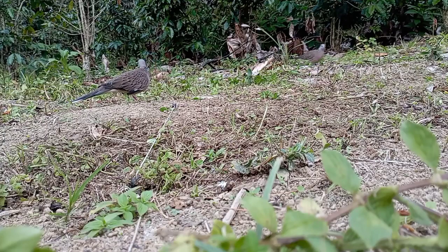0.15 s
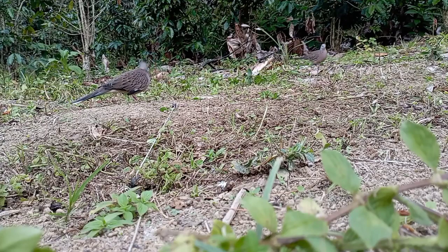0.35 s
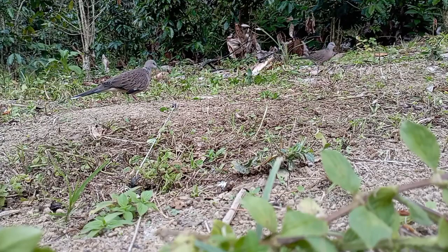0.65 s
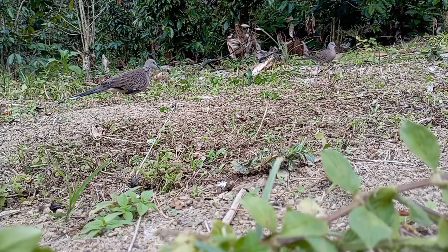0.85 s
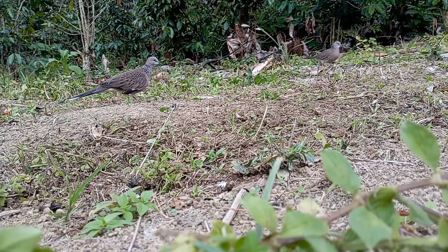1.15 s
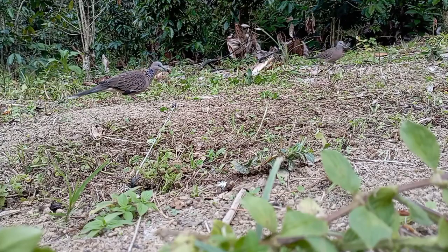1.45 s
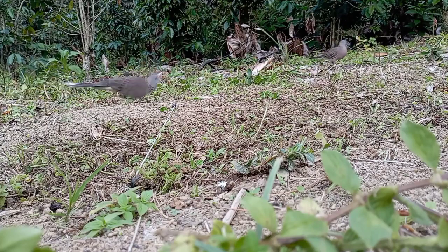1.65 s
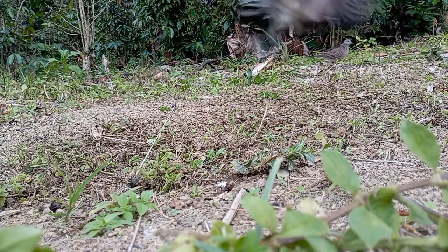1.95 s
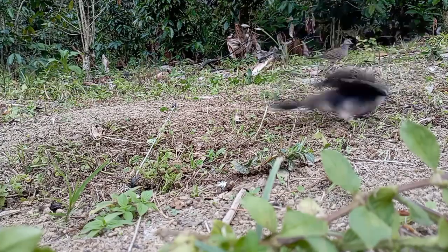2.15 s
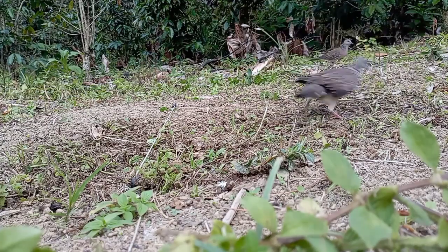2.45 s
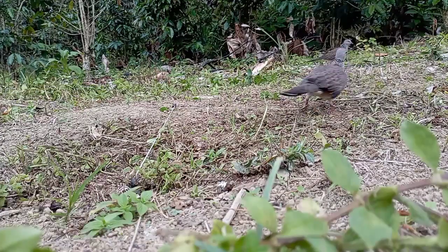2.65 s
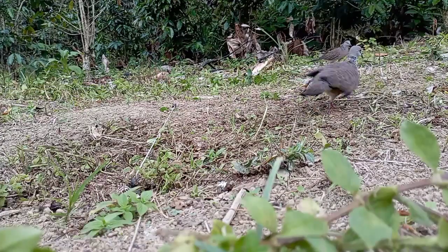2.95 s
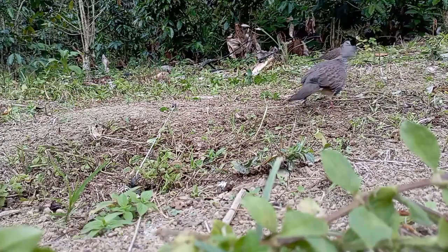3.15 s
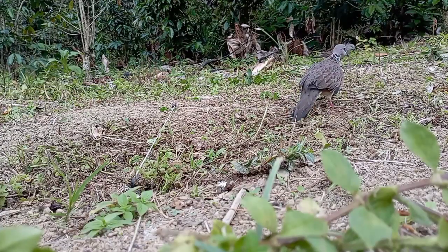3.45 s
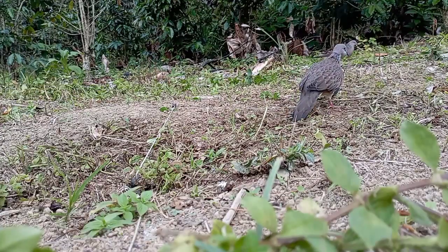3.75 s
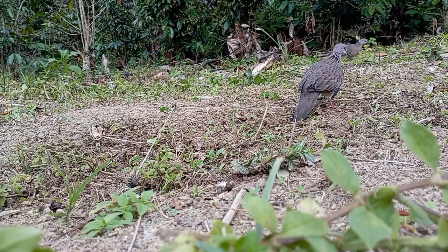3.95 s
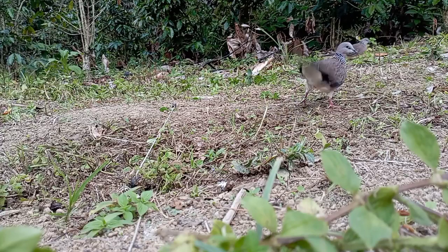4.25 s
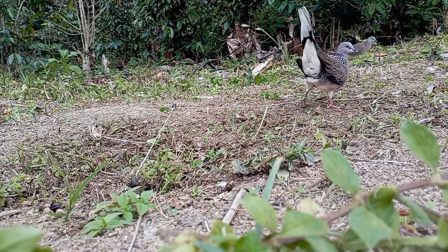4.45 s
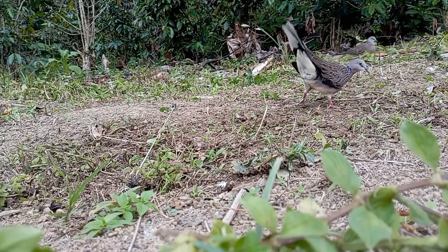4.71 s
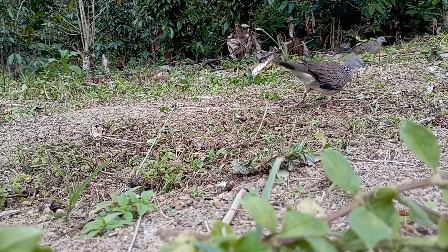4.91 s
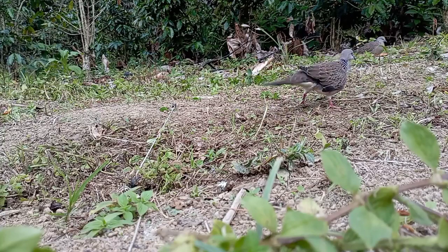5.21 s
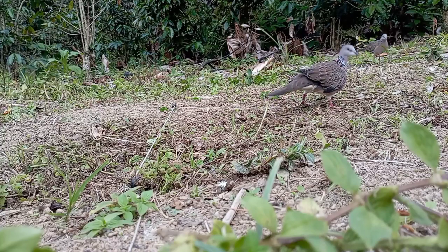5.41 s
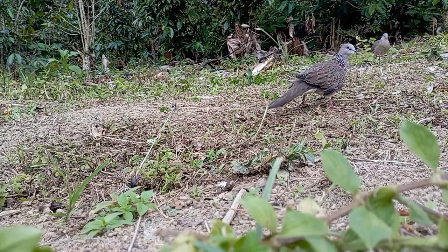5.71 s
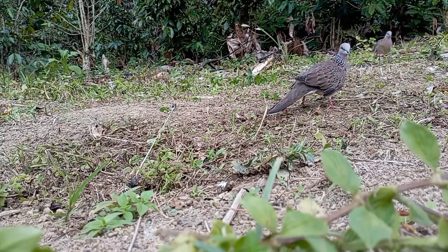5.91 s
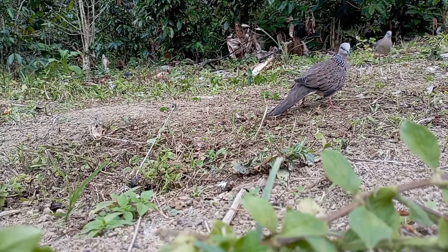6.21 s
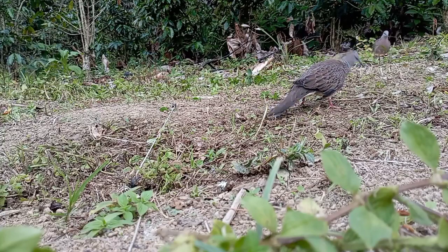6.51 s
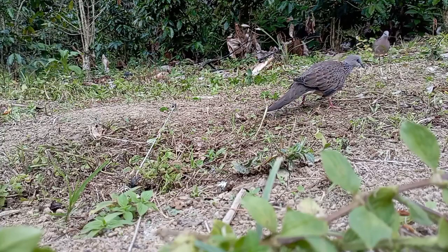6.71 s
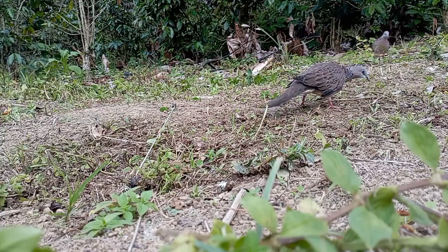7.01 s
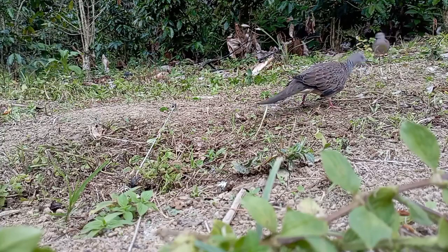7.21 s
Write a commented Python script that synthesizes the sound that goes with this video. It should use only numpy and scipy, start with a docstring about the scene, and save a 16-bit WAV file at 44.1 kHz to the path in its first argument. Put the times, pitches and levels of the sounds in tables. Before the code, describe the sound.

A quiet natural clearing: steady thin insect hiss, rapid cricket trills and barely audible distant doves. Then one sudden close burst of wingbeats, sharp snapping feathers, flat slaps and soft thuds of shoved air, lasting under half a second as the bird brakes and lands. A diffuse leafy echo fades quickly. The insects continue, with small birds chipping in quick falling runs, cricket chirps and a far hooting call near the end.

```python
"""Dove landing in a forest clearing

A dove flutters in close and lands: enveloped noise and short swings of pressure make its wings clap,
shove the air, rustle and hum. Around it lie two shimmering insect bands, squeaks, a pulsing bush cricket
and a chirping field cricket. Gliding tones make far doves coo and small birds call; filtered noise
makes a low distant rumble, and dying noise makes the echo of the trees."""
import sys
import numpy as np
from scipy import signal
from scipy.fft import irfft
from scipy.io import wavfile
from scipy.ndimage import uniform_filter1d

SR = 44100
rng = np.random.default_rng(int(sys.argv[2]) if len(sys.argv) > 2 else 0)


def wav_record(signal):
    """Record a signal, one row per channel, as 16-bit PCM in the file named by sys.argv[1]."""
    frames = np.transpose(np.atleast_2d(signal))
    bounded = np.clip(frames, -1, 1)
    # unit amplitude maps onto the largest positive 16-bit level
    quanta = np.round(bounded * 32767).astype(np.int16)
    wavfile.write(sys.argv[1], SR, quanta)


N = 325017
TIME = np.arange(N) / SR

# stereo width of the surroundings, then of the wings: (frequency [Hz], side minus mid [dB])
WIDTH = [(60, -5.5), (500, -1.5), (1000, 2), (2000, -0.5), (4000, 1), (9000, -0.5), (13000, 0.5)]
WING_WIDTH = [(60, -15), (600, -15.5), (1500, -7), (3000, 2), (5000, 2), (9000, 3), (13000, 0)]
# wing beats: (time [s], half length of contact [s], feather snap [dB], vane slap [dB], shoved air [dB],
# pitch of the shove [Hz], left minus right [dB]); each layer trims these levels
WING_BEATS = [(2.0257, 0.00049, -27, -33.5, -33, 280, -.5), (2.063, 0.0014, -36, -39, -35.5, 192, 2),
              (2.0936, 0.0016, -35.5, -43, -27.5, 380, 5), (2.1331, 0.0045, -37.5, -42.5, -31.5, 116, 3),
              (2.166, 0.0015, -29.5, -39.5, -27.5, 280, -1), (2.196, 0.0018, -52, -45.5, -37, 134, 0),
              (2.2201, 0.0022, -38, -38.5, -41, 250, -8), (2.233, 0.0015, -35, -36.5, -31.5, 197, -2),
              (2.256, 0.0041, -43, -39.5, -31, 520, -3), (2.2785, 0.00059, -29, -42, -28, 112, -3),
              (2.3036, 0.0034, -35, -45.5, -30.5, 236, 0), (2.329, 0.0043, -39.5, -37, -24, 377, -2),
              (2.364, 0.0036, -62, -61, -35, 146, 0), (2.4168, 0.0034, -54, -53, -43, 128, -4)]
# the wings open flat to brake over this time (from, to)
BRAKE_S = (2.04, 2.225)
# slur and hoots of the high doves: pitch at start, middle and end
HOOT_HZ = (850, 1044, 1106)


def from_db(db):
    """Decibels to gain."""
    return 10 ** (np.asarray(db) / 20)


def rms_one(x):
    """Scale to rms 1."""
    return x / np.sqrt(np.mean(x ** 2) + 1e-20)


def pan(db):
    """Left and right gains for a level difference; positive leans left."""
    return from_db(np.array([[db], [-db]]) / 2)


def at_hz(points, hz):
    """Read a spectrum on a log-frequency axis."""
    f, value = np.transpose(points)
    return np.interp(np.log(hz + 1), np.log(f), value)


def noise(spectrum, width):
    """Steady stereo noise of a given colour, falling off beyond its ends; rms 1."""
    hz = np.arange(N // 2 + 1) * SR / N + 1
    low_skirt = np.minimum(1, hz / spectrum[0][0]) ** 2
    high_skirt = np.minimum(1, spectrum[-1][0] / hz) ** 2
    mid, side = rng.standard_normal((2, len(hz))) + 1j * rng.standard_normal((2, len(hz)))
    spread = from_db(at_hz(width, hz))
    gain = from_db(at_hz(spectrum, hz)) * low_skirt * high_skirt / np.sqrt(1 + spread ** 2)
    return rms_one(irfft(gain * (mid + spread * side * [[1], [-1]]), N))


def drift(rate):
    """Random wander through `rate` new values a second; rms 1."""
    return rms_one(np.interp(TIME * rate, np.arange(N), rng.standard_normal(N)))


def bell(s, half):
    """A smooth swell around a moment."""
    return np.exp(-np.clip((TIME - s) / half, -10, 10) ** 2 / 2)


def dying(s, decay_s):
    """A sudden start that dies away exponentially."""
    return (TIME > s) * np.exp(-np.clip((TIME - s) / decay_s, 0, 20))


def tone(hz):
    """A sine whose phase follows a moving pitch."""
    return np.sin(2 * np.pi * np.cumsum(hz) / SR)


def notes(rows, waver=0):
    """Pure notes that swell and fade while the pitch arches through three points."""
    out = np.zeros(N)
    wobble = 1 + waver + .003 * drift(80)
    for s, length, first, middle, last, db in rows:
        i = np.arange(max(0, int(s * SR)), min(N, int((s + length) * SR)))
        u = np.linspace(0, 1, len(i))
        arch = np.polyfit([0, .5, 1], [first, middle, last], 2)
        hz = np.polyval(arch, u) * wobble[i]
        out[i] += from_db(db) * np.sin(np.pi * u) * tone(hz)
    return out


def forest(x, t60, delay):
    """Trunks and leaves scatter a diffuse echo that builds, then dies, different on each side."""
    t = np.arange(SR) / SR
    scatter = rng.standard_normal((2, SR)) * from_db(-60 * t / t60) * (1 - np.exp(-t / delay))
    scatter /= np.sqrt(np.sum(scatter ** 2, axis=1, keepdims=True))
    return signal.fftconvolve(x * np.ones((2, 1)), scatter, axes=1)[:, :N]


def among_trees(song, echo_db=-8):
    """Bird song heard directly and as an echo from the forest."""
    return song * pan(0.43) + from_db(echo_db) * forest(song, t60=0.58, delay=0.011)


def far_air(level_db=-64):
    """Low distant rumble with a faint airy top, its level drifting slightly."""
    # colour: (frequency [Hz], level [dB per Hz])
    air_colour = [(20, -28), (45, -16.5), (75, -0.5), (150, -2.5), (300, -7), (500, -11), (700, -15),
                  (850, -21.5), (1300, -24.5), (2000, -27.5), (4300, -25), (7000, -29.5), (10500, -29),
                  (13000, -33.5)]
    return from_db(level_db + 0.45 * drift(8)) * noise(air_colour, WIDTH) * pan(-0.33)


def insects(high_db=-69.0, low_db=-74.0, squeak_db=-78.5):
    """Many far insects merge into two shimmering noise bands; one squeaks in pairs above them."""
    # colour of each band: (frequency [Hz], level [dB per Hz])
    high_colour = [(6800, -33), (7800, -17), (8250, -6), (8700, -2.5), (9250, -6.5), (9700, -18),
                   (11000, -31)]
    low_colour = [(4600, -31), (5100, -10), (5500, -2.5), (5850, -2), (6250, -2), (6500, -16.5),
                  (7000, -45)]
    high = from_db(high_db + 0.49 * drift(60)) * noise(high_colour, WIDTH) * pan(2.0)
    low = from_db(low_db + 1.45 * drift(30)) * noise(low_colour, WIDTH) * pan(-0.41)
    first_s, every_s, pair_s, count = .129, .2795, .063, 7
    starts = [first_s + n * every_s + k * pair_s for n in range(count) for k in (0, 1)]
    squeaks = notes([(s, .03, 12150, 12080, 11950, squeak_db) for s in starts])
    return high + low + squeaks * pan(3.0)


def bush_cricket(level_db=-70.0, echo_db=-6):
    """Each wing scrape is a short rising tone; about ten make a trill."""
    # the trills fall behind or run ahead of an even beat: (time [s], delay [s])
    trill_delay = [(0, .008), (.55, -.018), (3.25, .025), (4.0, -.011), (4.85, -.021), (5.5, .003)]
    first_rest_s, trill_every_s, rest_s = .096, .22705, .028   # rest_s is each side of the beat
    pulse_hz, low_hz, rise_hz, unevenness = 62.7, 4950, 950, .1
    delay = np.interp(TIME, *np.transpose(trill_delay))
    since_rest = (TIME - first_rest_s - delay) % trill_every_s
    from_nearest_rest = np.minimum(since_rest, trill_every_s - since_rest)
    singing = uniform_filter1d(1. * (from_nearest_rest > rest_s), size=300)   # softened edges
    scrape = (since_rest * pulse_hz + unevenness * drift(40)) % 1   # progress through one scrape
    hz = low_hz + rise_hz * scrape + 35 * drift(100)
    pressure = np.sin(np.pi * scrape) ** 3
    trill = from_db(level_db + drift(40)) * singing * pressure * tone(hz)
    return trill * pan(6.1) + from_db(echo_db) * forest(trill, t60=0.043, delay=0.0053)


def litter(decay_s=0.0029):
    """Dry leaves and twigs give tiny bright ticks of noise that die at once."""
    # ticks: (time [s], level [dB])
    ticks = [(0.2234, -64), (1.8667, -61), (2.4618, -55), (2.484, -59), (2.8389, -61), (6.34, -67)]
    level = sum(from_db(db) * dying(s, decay_s) for s, db in ticks)
    return level * noise([(3000, -16), (7000, -10), (10500, 10), (15000, -3)], WIDTH)


def high_call(s, hold_s, db, hoot_s=.04, held_db=-7.0, spacing_s=0.076, slowing_s=.0055, count=4):
    """Notes of one call: a slur up, a softer held note, then hoots that come ever later."""
    held_hz = (1150, 1195, 1153)
    slur = (s, hoot_s, *HOOT_HZ, db)
    held = (s + hoot_s, hold_s, *held_hz, db + held_db)
    hoots_s = s + hoot_s + hold_s
    hoots = [(hoots_s + k * spacing_s + k * k * slowing_s, hoot_s, *HOOT_HZ, db) for k in range(count)]
    return [slur, held] + hoots


def doves(high_coo_db=-1.5):
    """Far doves coo in arching tones, one in a quickening roll; higher calls break into hoots."""
    # coos: (start [s], length [s], top pitch [Hz], level [dB])
    coo_rows = [(0.268, 0.18, 742, -64.5), (0.867, 0.21, 710, -66.5), (1.363, 0.175, 675, -70),
                (2.739, .1, 680, -72.5), (3.213, 0.108, 690, -76), (3.844, .1, 706, -80),
                (6.543, .11, 711, -73.5)]
    # rolled coo: (start [s], length [s], first, middle, last pitch [Hz], level before the throb [dB])
    rolled_coo = [(.53, .56, 690, 719.5, 660, -71)]
    # high calls: (start [s], hold [s], level before the trim [dB])
    high_calls = [(0.504, .205, -73.5), (5.505, .185, -72.5)]
    first_share, last_share = .72, .758   # pitch at the ends of a coo, as a share of its top
    coos = [(s, length, first_share * hz, hz, last_share * hz, db) for s, length, hz, db in coo_rows]
    roll_hz = np.interp(TIME, [.62, .95], [24, 47])
    throb = 2 * np.pi * np.cumsum(roll_hz) / SR
    # each throb of the roll swells and bends the pitch
    bend = .06 * np.cos(throb) + .006 * drift(50)
    rolled = (1 + np.sin(throb)) * notes(rolled_coo, waver=bend)
    hoots = [note for call in high_calls for note in high_call(*call)]
    return among_trees(notes(coos) + rolled + from_db(high_coo_db) * notes(hoots))


def field_cricket(pitch_hz=4080, direct_db=-1.0, echo_db=-8):
    """Far, short chirps near one pitch, with a soft echo from the trees."""
    # runs of chirps: (first chirp [s], count, level before direct and echo trims [dB])
    chirp_runs = [(.345, 4, -75), (3.125, 7, -74.5), (4.856, 8, -75), (6.575, 8, -76)]
    spacing_s, half_s, waver_hz = .0665, .011, 30
    level = sum(from_db(db) * bell(s + k * spacing_s, half_s)
                for s, count, db in chirp_runs for k in range(round(count)))
    chirps = level * tone(pitch_hz + waver_hz * drift(150))
    echo = from_db(echo_db) * forest(chirps, t60=0.38, delay=0.012)
    return (from_db(direct_db) * chirps + echo) * pan(5.9)


def effort(rise_db_per_s, release_s):
    """Gain of the flight: it swells as the dove comes near, holds, and dies away on landing."""
    full_from_s, full_to_s = 2.033, 2.33
    early = np.maximum(full_from_s - TIME, 0)
    late = np.maximum(TIME - full_to_s, 0)
    return from_db(np.maximum(-rise_db_per_s * early, -200)) * np.exp(-np.minimum(late / release_s, 10) ** 2 / 2)


def flutter(rustle_db=-51.0, braking_rustle_db=-48.5, rush_db=-42.0):
    """Feathers catch and slide over each other in fine grains while air rushes round the wings."""
    # colours: (frequency [Hz], level [dB per Hz])
    rustle_colour = [(1200, -23), (2200, -9), (3300, -6.5), (4600, -11), (6500, -7), (7900, -2.5),
                     (9600, -2), (10600, -2.5), (12000, -8), (13800, -9), (15300, -13), (16300, -25)]
    rush_colour = [(35, -22), (55, 4), (90, 8.5), (250, 2), (500, -4), (800, -14.5), (1200, -22),
                   (1900, -26), (4000, -56)]
    grains = rms_one(from_db(3 * drift(1400) + 1.5 * drift(150)))
    rustle = from_db(np.interp(TIME, BRAKE_S, [rustle_db, braking_rustle_db]))
    rustle = rustle * effort(rise_db_per_s=380, release_s=0.051) * grains
    rush = from_db(rush_db) * effort(rise_db_per_s=750, release_s=0.063)
    return rustle * noise(rustle_colour, WING_WIDTH) + rush * noise(rush_colour, WING_WIDTH)


def swing(s, hz, cycles):
    """One smooth swing of pressure around a moment."""
    return bell(s, cycles / hz) * np.sin(2 * np.pi * hz * (TIME - s))


def strokes(push_db=2.0, cycles=0.54, lead_s=0.0011, recoil_db=-7, recoil_s=0.00944, recoil_hz=140):
    """Wings shove the air just before they meet; a softer swing follows as they turn back."""
    out = np.zeros(N)
    for s, _, _, _, db, hz, _ in WING_BEATS:
        out += from_db(db + push_db) * swing(s - lead_s, hz, cycles)   # slower strokes are deeper
        out += from_db(db + recoil_db) * swing(s + recoil_s, recoil_hz, cycles)
    return out * pan(-0.94)


def claps(snap_db=-0.5, slap_db=-12.0, braking_slap_db=0.5, puff_db=-4.5, shiver_db=-17):
    """Wings meet: feather edges snap, the vanes slap, trapped air puffs out, the feathers shiver on."""
    # colours: (frequency [Hz], level [dB per Hz])
    feather_colour = [(2400, -58), (3000, -19), (3700, -10.5), (4600, -11.5), (6500, -2), (7900, -2.5),
                      (9300, -1), (10400, 2.5), (11500, -3.5), (13500, -11), (15300, -11), (16500, -26)]
    slap_colour = [(900, -4), (1500, 3), (2100, -2.5), (3100, 1.5), (4500, -12.5), (8000, -6.5)]
    puff_colour = [(100, -30), (220, -4), (380, 0), (620, -4), (820, -15), (1250, -26), (2200, -40)]
    puff_half_s, puff_spread, shiver_s = 0.0028, 0.89, 0.012
    # beats overlap by adding their power
    snap, slap, puff = np.zeros((2, N)), np.zeros(N), np.zeros(N)
    for s, half, feather_db, vane_db, air_db, _, side_db in WING_BEATS:
        contact = bell(s, half) + from_db(shiver_db) * dying(s, shiver_s)
        flat_db = np.interp(s, BRAKE_S, [slap_db, braking_slap_db])   # braking wings meet flat, slap harder
        snap += (from_db(feather_db) * contact * pan(side_db)) ** 2
        slap += (from_db(vane_db + flat_db) * contact) ** 2
        puff += (from_db(air_db) * bell(s, np.hypot(puff_half_s, puff_spread * half))) ** 2
    return (from_db(snap_db) * np.sqrt(snap) * noise(feather_colour, WING_WIDTH)
            + np.sqrt(slap) * noise(slap_colour, WING_WIDTH)
            + from_db(puff_db) * np.sqrt(puff) * noise(puff_colour, WING_WIDTH))


def quills(hardest_db=-25, growth=6.6):
    """Stiff hollow shafts ring for a millisecond when squeezed together, far more on the hardest beats."""
    # ringing of the shafts: (frequency [Hz], relative level [dB])
    shaft_rings = [(3750, -4), (4400, -11), (5100, -9), (9150, 0), (10300, -1), (13300, -8)]
    half_s, detune = .00055, .01
    out = np.zeros((2, N))
    hardest = max(beat[2] for beat in WING_BEATS)
    for s, _, snap_db, _, _, _, side_db in WING_BEATS:
        i = np.flatnonzero(np.abs(TIME - s) < 10 * half_s)
        t = TIME[i] - s - np.array([[0], [1]]) / SR   # it reaches the left side first
        ring = 0
        for hz, db in shaft_rings:
            ring_hz = hz * (1 + detune * rng.standard_normal())
            ring = ring + from_db(db) * np.cos(2 * np.pi * ring_hz * t + 2 * np.pi * rng.random())
        level = from_db(hardest_db + growth * (snap_db - hardest))
        out[:, i] += level * ring * bell(s, half_s)[i] * pan(side_db)
    return out * pan(2.5)


def swishes(wake_db=-1.0, sweep_db=-13, braking_sweep_db=-19):
    """Wing tips cut the air on the way into each beat after the first; every beat leaves turbulence."""
    # colour: (frequency [Hz], level [dB per Hz])
    swish_colour = [(450, 3), (700, 0.5), (1000, 1.5), (1300, -3.5), (1600, -8.5), (2200, -19)]
    sweep_lead_s, sweep_half_s, wake_half_s, wake_spread = .015, 0.0042, 0.0017, 0.64
    sweep, wake = np.zeros(N), np.zeros(N)   # power
    for s, _, _, _, air_db, _, _ in WING_BEATS[1:]:
        sweep += (from_db(air_db) * bell(s - sweep_lead_s, sweep_half_s)) ** 2
    sweep *= from_db(np.interp(TIME, BRAKE_S, [sweep_db, braking_sweep_db])) ** 2
    for s, half, _, vane_db, *_ in WING_BEATS:
        wake += (from_db(vane_db + wake_db) * bell(s, np.hypot(wake_half_s, wake_spread * half))) ** 2
    return np.sqrt(sweep + wake) * noise(swish_colour, WING_WIDTH)


def wing_hum():
    """The braking wings hum for a moment on one low, nearly level note."""
    # hum: (start [s], length [s], first, middle, last pitch [Hz], level [dB])
    hum = [(2.408, 0.048, 414, 416, 421, -49.5)]
    return notes(hum)


def small_birds(trim_db=-2):
    """Small birds chip in quick runs of falling notes; one gives a rising whistle."""
    # runs of like chips: (start [s], count, level before the trim [dB])
    chip_runs = [(3.132, 1, -69), (3.36, 3, -70), (3.672, 3, -69), (3.949, 3, -68), (4.265, 3, -69.5)]
    # whistle: (start [s], length [s], first, middle, last pitch [Hz], level before the trim [dB])
    whistle = [(6.075, .11, 1840, 2600, 2560, -75)]
    spacing_s, length_s, first_hz, last_hz = .045, .038, 4770, 4160
    middle_hz = (first_hz + last_hz) / 2
    chips = [(s + k * spacing_s, length_s, first_hz, middle_hz, last_hz, db)
             for s, count, db in chip_runs for k in range(round(count))]
    return among_trees(from_db(trim_db) * notes(chips + whistle))


def scene():
    """The near wings with their forest echo, over the life of the clearing."""
    clearing = far_air() + insects() + bush_cricket() + litter() + doves() + field_cricket() + small_birds()
    wings = flutter() + claps() + quills() + swishes() + wing_hum()
    # foliage throws back mostly treble
    bright = signal.sosfilt(signal.butter(1, 2500, "high", fs=SR, output="sos"), wings)
    bright_echo = from_db(-17) * forest(bright, t60=0.68, delay=0.007)
    full_echo = from_db(-27.0) * forest(wings, t60=0.97, delay=0.023)
    return clearing + wings + strokes() + bright_echo + full_echo


def record(dry):
    """The microphone drops the deepest bass; the top is cut steeply."""
    lean = signal.sosfilt(signal.butter(2, 35, "high", fs=SR, output="sos"), dry)
    return signal.sosfilt(signal.ellip(10, .1, 80, 15900, fs=SR, output="sos"), lean)


dry = scene()
out = record(dry)
wav_record(out)
```